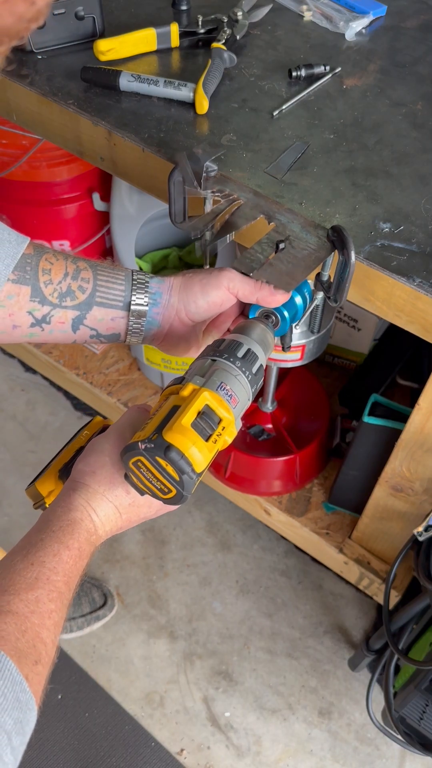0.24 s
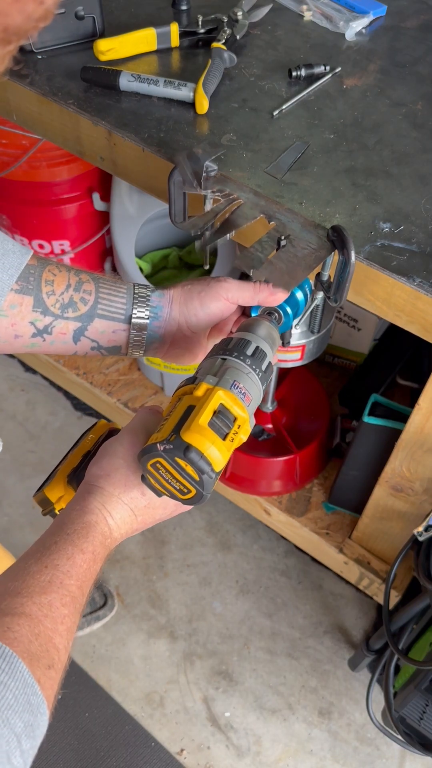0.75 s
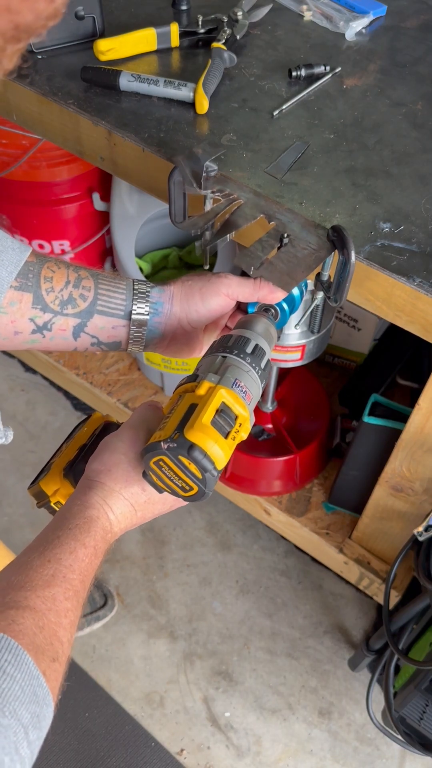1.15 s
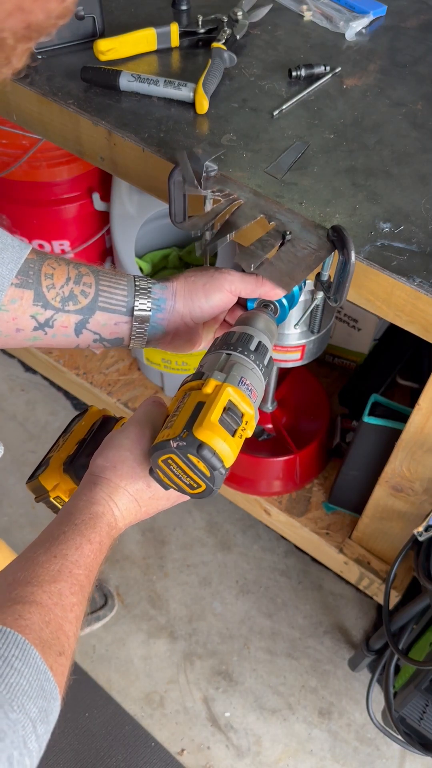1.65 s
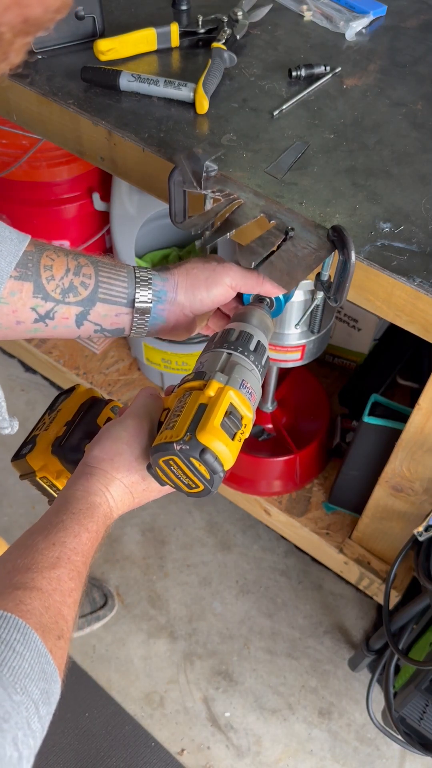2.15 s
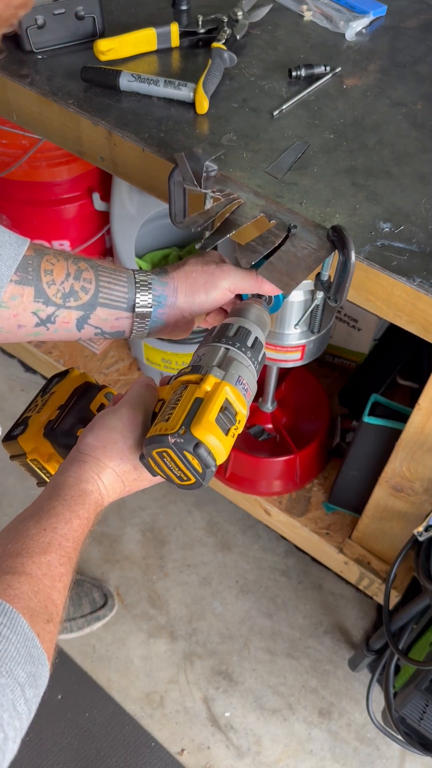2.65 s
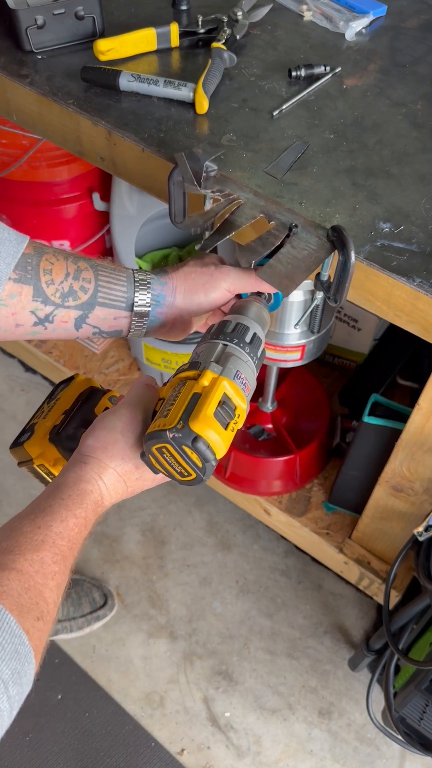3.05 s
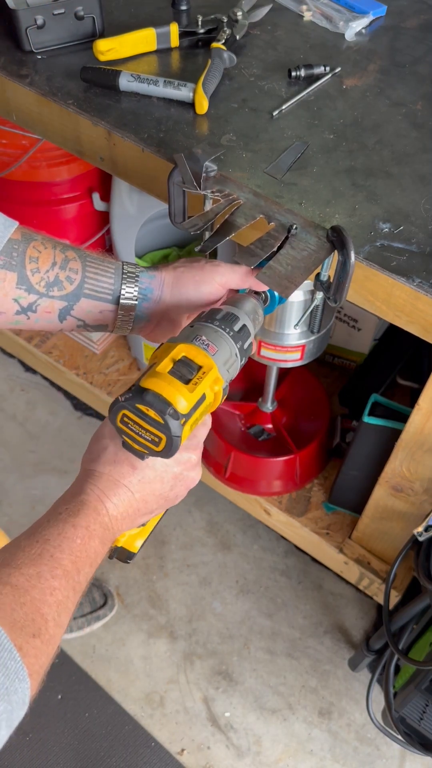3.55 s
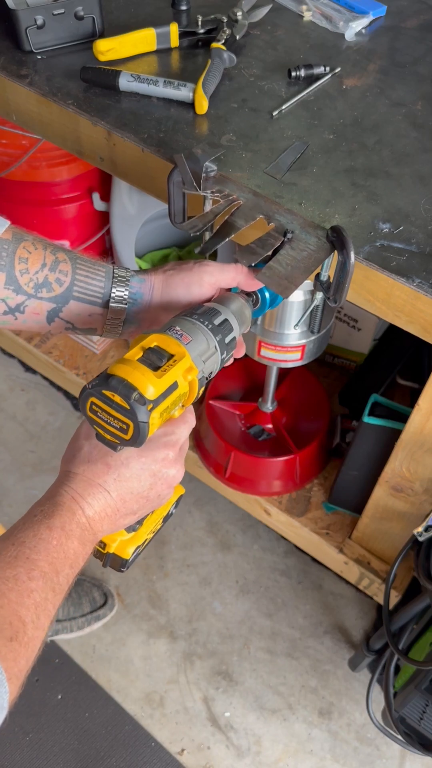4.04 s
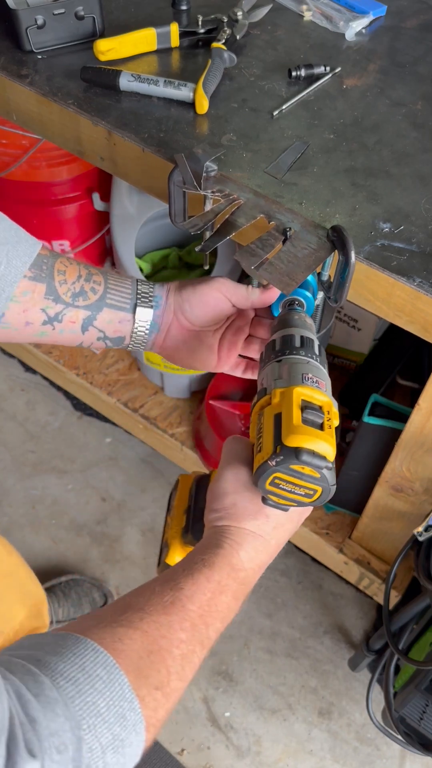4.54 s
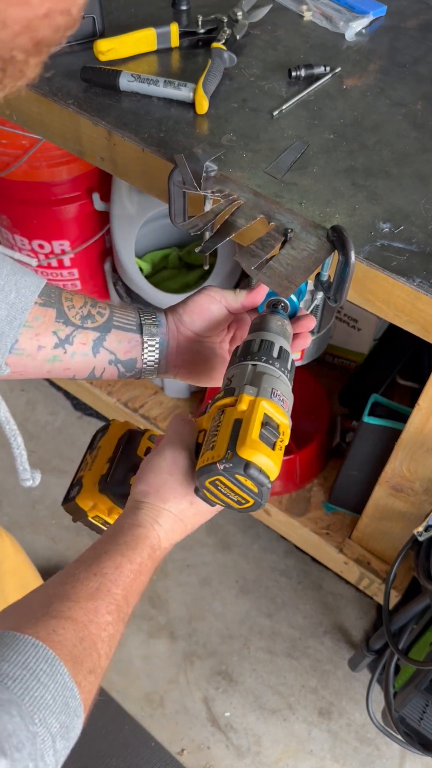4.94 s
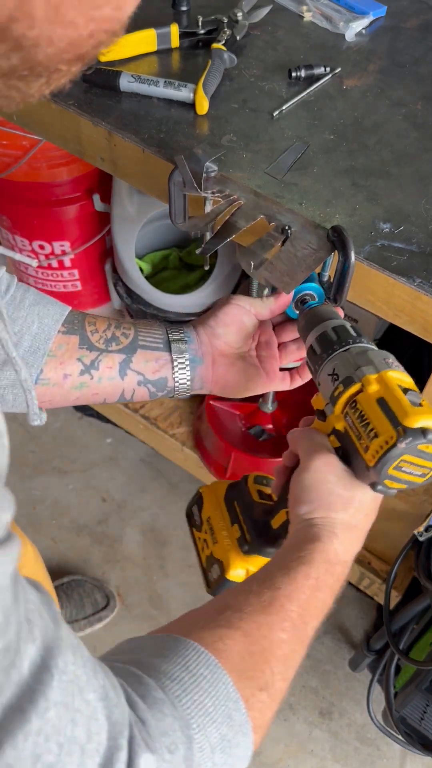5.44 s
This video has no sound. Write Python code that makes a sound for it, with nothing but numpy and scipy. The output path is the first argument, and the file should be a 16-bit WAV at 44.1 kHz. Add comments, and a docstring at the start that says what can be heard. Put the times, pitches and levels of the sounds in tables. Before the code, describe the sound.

Close up in a small garage, a cordless drill drives a nibbler through sheet steel: about twenty-two sharp snaps and clanks a second over rattling sheet and gear noise. It stops abruptly after three seconds, taps the metal, runs briefly with weaker bites and a clear whine, stops again for under a second, then restarts louder and cuts until the end. Close stereo microphone, short room tail.

```python
"""Drill-driven nibbler on sheet steel

A cordless drill drives a nibbler through a steel sheet clamped to a garage workbench, in three runs.
About 22 listed bites a second: noise bursts for chip, head and sheet, damped sines for the struck notes.
Grains of noise chatter in between; sines locked to the motor angle whine, loudest when the punch runs free.
Falling tones bump the bench, short bursts are the tool touching the sheet; a diffuse tail is the garage."""
import sys
import numpy as np
from scipy import signal
from scipy.fft import rfft, irfft, next_fast_len
from scipy.io import wavfile

SR = 44100
rng = np.random.default_rng(int(sys.argv[2]) if len(sys.argv) > 2 else 0)


def int16_out(signal):
    """Quantize to a 16-bit WAV file."""
    q = np.round(np.clip(np.atleast_2d(signal).T, -1, 1) * 32767)
    wavfile.write(sys.argv[1], SR, q.astype(np.int16))


N = 250929
TIME = np.arange(N) / SR

# Trigger held. Each row: start in seconds, stop in seconds, share of full speed,
# gear noise in dB at full speed.
DRILL_RUNS = [(-1, 3.262, 1, -35.5), (3.59, 4.285, 1.003, -35.5), (5.07, 7, 1, -29.5)]
# Resonances of the sheet under the tool. Each row: centre in Hz, width in Hz, lift in dB.
SHEET_MODES = [(381, 16, 9), (492, 36, 4.5), (552, 120, 5), (676, 45, 7), (838, 30, 4.5), (1095, 25, 4),
               (1170, 45, 0.5), (1320, 50, 4.5), (1680, 50, 3), (2265, 36, 5), (2630, 70, 4.5),
               (3236, 45, 1.5), (3886, 120, 3), (4635, 50, 3), (5720, 90, 4), (7060, 110, 6.5),
               (8250, 150, 2.5), (8900, 150, 3), (9930, 80, 2.5)]
# Spectrum of the sheet's knock. Each row: frequency in Hz, relative level in dB.
KNOCK_SPECTRUM = [(100, -28.5), (300, -19.5), (550, -7.5), (900, -2), (1250, 5), (1800, 1.5), (2500, -17.5),
                  (6000, -35.5)]
# Spectrum of the bench's thud and rumble. Each row: frequency in Hz, relative level in dB.
THUD_SPECTRUM = [(22, -34), (40, -17), (60, 4), (90, -1), (140, -5), (250, 0.5), (500, -12.5), (900, -12.5)]


def from_db(db):
    """Decibels to amplitude gain."""
    return 10 ** (np.asarray(db) / 20)


def rms_one(x):
    """Scale to unit power."""
    return x / np.sqrt(np.mean(x ** 2) + 1e-20)


def in_time(rows):
    """Each column after the time column, interpolated to every sample."""
    s, *columns = np.transpose(rows)
    return [np.interp(TIME, s, column) for column in columns]


def drift(rate_hz):
    """Slow random wander of spread 1, with rate_hz new targets a second."""
    return rms_one(np.interp(TIME * rate_hz, np.arange(4096), rng.standard_normal(4096)))


def colour(x, spectrum, modes=(), size=8192):
    """Causal filter: broad spectrum plus resonances; white noise keeps its power."""
    hz = np.maximum(np.fft.rfftfreq(size, 1 / SR), 1)
    points = np.array(spectrum)
    db = np.interp(np.log(hz), np.log(points[:, 0]), points[:, 1])
    for centre_hz, width_hz, lift_db in modes:
        db = db + lift_db / (1 + (2 * (hz - centre_hz) / width_hz) ** 2)
    cepstrum = irfft(np.log(from_db(db)))[:size // 2]
    cepstrum[1:] *= 2   # minimum phase: nothing sounds before its cause
    response = irfft(np.exp(rfft(cepstrum, size)))
    return signal.fftconvolve(x, response / np.linalg.norm(response))[:len(x)]


def grains(per_s, spread_db):
    """Random metal-to-metal contacts of uneven size; unit power."""
    hits = rng.random(N) < per_s / SR
    signs = rng.choice([-1, 1], N)
    sizes = from_db(spread_db * np.clip(rng.standard_normal(N), -2, 2))
    return rms_one(hits * signs * sizes)


def bursts(times_s, levels_db, rise_s, decay_s):
    """Envelope rising exponentially to each moment and decaying exponentially after it."""
    out = np.zeros(N)
    for s, db, rise, decay in np.broadcast(times_s, levels_db, rise_s, decay_s):
        near = slice(max(int((s - 8 * rise) * SR), 0), int((s + 8 * decay) * SR))
        t = TIME[near] - s
        out[near] += from_db(db) * np.exp(np.minimum(t / rise, -t / decay))
    return out


def ring(times_s, levels_db, hz, t60_s):
    """Two-pole resonator struck at the given moments: a damped sine."""
    clicks = np.zeros(N)
    clicks[(np.asarray(times_s) * SR).astype(int)] = from_db(levels_db)
    radius = from_db(-60 / (t60_s * SR))
    turn = 2 * np.pi * hz / SR
    feedback = [1, -2 * radius * np.cos(turn), radius * radius]
    return signal.lfilter([0, np.sin(turn)], feedback, clicks + 1e-18)


def resonance(x, hz, width_hz):
    """The part of a sound that one fixed resonance passes; gain 1 at its centre."""
    return signal.lfilter(*signal.iirpeak(hz, hz / width_hz, fs=SR), x)


def gliding(x, hz, width_hz):
    """The part a moving resonance passes: shift to 0 Hz, one-pole lowpass, shift back."""
    turn = np.exp(2j * np.pi * np.cumsum(hz) / SR)
    radius = np.exp(-np.pi * width_hz / SR)
    return 2 * (turn * signal.lfilter([1 - radius], [1, -radius], x / turn)).real


def bite_at(times_s):
    """Index of the bite in force at every sample, from 15 ms ahead of it."""
    return np.clip(np.searchsorted(times_s - .015, TIME) - 1, 0, len(times_s) - 1)


def uneven(x, times_s, spread_db=2.3):
    """Every bite excites the modes of the head with strengths of its own."""
    # Steel of the nibbler head. Each row: centre in Hz, width in Hz.
    head_modes = [(2800, 400), (3900, 450), (4450, 300), (5300, 200), (6100, 160), (7060, 130), (7500, 160),
                  (8050, 160), (8500, 160), (9400, 900)]
    which = bite_at(times_s)
    draws = np.clip(rng.standard_normal((len(times_s), len(head_modes))), -1.5, 1.5)
    gains = from_db(spread_db * draws - 1.0)
    for k, (hz, width_hz) in enumerate(head_modes):
        x = x + resonance(x * (gains[which, k] - 1), hz, width_hz)
    return x


def punch(s, snap_db, clank_db, knock_db, rattle_db, clank_hz, shear_s):
    """Punch shears, chip snaps, steel head clanks, sheet knocks and rings, bench thuds 4 ms later."""
    # Chip, head and rattle spectra. Each row: frequency in Hz, relative level in dB.
    snap_spectrum = [(200, -28), (1000, -9), (4800, -7.5), (6000, -1.5), (8300, 3.5), (10500, 1),
                     (12500, -3.5), (15500, -3.5)]
    clank_spectrum = [(300, -30), (1700, -15), (2500, -4), (3100, -0.5), (3800, 3), (4500, -1.5),
                      (5300, -13), (9000, -26)]
    rattle_spectrum = [(300, -10), (1200, -5.5), (2500, 1.5), (5000, -1.5), (8000, 3), (11000, 1),
                       (15500, -2.5)]
    # Damped notes of the sheet near the die. Each row: frequency in Hz, relative level in dB,
    # t60 in seconds.
    bite_notes = [(1010, -5, 0.018), (1290, -3, 0.026), (1750, -7, 0.018)]

    snap = bursts(s, snap_db + 1.3, rise_s=shear_s / 3, decay_s=shear_s)
    snap = snap * grains(per_s=40000, spread_db=1.0)
    clank = bursts(s, clank_db - 2.4, rise_s=.0004 + shear_s / 3, decay_s=.001 + shear_s)
    clank = clank * grains(per_s=40000, spread_db=1.0)
    pitched = gliding(clank, clank_hz[bite_at(s)], width_hz=260)
    clank = colour(clank, clank_spectrum) + from_db(7.0) * pitched
    rattle = bursts(s, rattle_db - 1.4, rise_s=.0026, decay_s=.009)
    rattle = rattle * grains(per_s=9000, spread_db=3.5)
    head = uneven(colour(snap, snap_spectrum) + clank + colour(rattle, rattle_spectrum, SHEET_MODES), s)

    knock_s = s - .0005
    knock = bursts(knock_s, knock_db + .3, rise_s=.002, decay_s=.0045)
    knock = knock * grains(per_s=15000, spread_db=1.0)
    notes = np.zeros(N)
    for k, (hz, db, t60_s) in enumerate(bite_notes):
        strike_db = knock_db + db + .8 + rng.normal(0, 2.5, len(s))
        notes += (-1) ** k * ring(knock_s, strike_db, hz, t60_s)
    thud = bursts(s + .004, knock_db - 11.5, rise_s=.0009, decay_s=.0053)
    thud = thud * grains(per_s=6000, spread_db=1.0)
    return head + notes + colour(knock, KNOCK_SPECTRUM, SHEET_MODES) + colour(thud, THUD_SPECTRUM)


def chatter(bite_s, speed, return_s=.021, scrape_db=-4.5, clatter_db=-.9, drone_db=-.8,
            speed_power=5.0, rough_db=1.5, uneven_db=2.3):
    """Sheet chatters in the die, most as the punch scrapes back up; fades as the motor slows."""
    # Chatter as the tool is fed. Each row: time in seconds, bright clatter in dB, sheet drone in dB,
    # both at full speed before roughness and trim.
    feed = [(0, -27, -31.5), (.25, -27.5, -33.5), (.31, -32.5, -41), (.45, -35, -47), (.49, -29, -35),
            (1.1, -26.3, -34), (1.85, -26.3, -33.5), (2.2, -25.5, -39), (2.98, -25.5, -41),
            (3.2, -36.5, -46), (3.69, -40, -52), (3.73, -23.5, -34), (3.9, -30.5, -47), (4.14, -32, -51),
            (4.22, -27, -40), (5.15, -30, -38), (5.19, -22.5, -34.5), (5.35, -23.5, -37),
            (5.43, -22.8, -29), (5.69, -24.5, -35)]
    # Each row: frequency in Hz, relative level in dB.
    clatter_spectrum = [(200, -35.5), (700, -9), (1200, -3), (2000, 1.3), (3500, -2.5), (5500, -0.5),
                        (7000, -0.5), (8700, 5.5), (10500, 1), (12500, -3), (15500, 1.5)]
    drone_spectrum = [(40, -22), (120, -13), (280, -9), (480, -4.5), (750, -2), (1100, 0.5), (2000, -14),
                      (6000, -29)]

    bright, low = from_db(in_time(feed)) * speed ** speed_power * from_db(rough_db * drift(rate_hz=260))
    late, hard = rng.standard_normal((len(bite_s), 2)).T
    scrape_s = bite_s + return_s + .003 * late
    hard_db = scrape_db + uneven_db * np.clip(hard, -1.5, 1.5)
    scrape = 1 + bursts(scrape_s, hard_db, rise_s=.007, decay_s=.006)
    clatter = bright * scrape * grains(per_s=7000, spread_db=2.6)
    clatter = uneven(colour(clatter, clatter_spectrum, SHEET_MODES), bite_s, spread_db=3.5)
    drone = colour(low * grains(per_s=2500, spread_db=2.5), drone_spectrum, SHEET_MODES)
    return from_db(clatter_db) * clatter + from_db(drone_db) * drone


def swelling_bands(x, fade_s=.06):
    """Bands of tool and cutting noise swell and fade: sheet tones, low rumble, motor hum; some slide."""
    # Each row: start in seconds, end in seconds, start in Hz, end in Hz, width in Hz, lift in dB.
    lifted_bands = [(-.1, 0.24, 2240, 2240, 170, 5), (-.1, .3, 705, 705, 45, 6),
                    (0.48, 0.82, 715, 730, 40, 12), (-.1, .9, 2700, 2600, 350, 3.5),
                    (.9, 1.45, 2640, 2640, 200, 3.5), (.9, 1.15, 700, 675, 40, 5),
                    (1.05, 1.42, 560, 530, 40, 6), (1.48, 2.02, 540, 480, 35, 7),
                    (1.2, 1.55, 1100, 1085, 40, 5), (1.5, 2.45, 835, 815, 30, 6),
                    (2.1, 3.17, 950, 920, 130, 4.5), (2.72, 3.14, 1120, 1020, 30, 9),
                    (2.5, 3.15, 2310, 2310, 222, 3), (2, 3.1, 3800, 3700, 600, 1),
                    (3.68, 3.93, 700, 680, 35, 8), (4.13, 4.33, 700, 680, 40, 10),
                    (5.1, 5.28, 4300, 4150, 250, 5), (5.28, 5.53, 4150, 4150, 800, 3),
                    (5.15, 5.75, 215, 215, 70, 7), (.79, 1.0, 2980, 2980, 130, 6),
                    (2.15, 2.42, 10150, 9750, 200, 8), (2.83, 3.03, 7060, 7060, 50, 10),
                    (3.02, 3.12, 2970, 2970, 100, 4), (2.95, 3.25, 400, 380, 120, 6),
                    (2.98, 3.24, 160, 160, 70, 8), (3.62, 3.76, 4200, 4200, 400, 5),
                    (3.7, 3.86, 925, 925, 50, 7), (3.9, 4.14, 670, 670, 35, 6),
                    (3.7, 3.85, 5880, 5880, 90, 7), (5.36, 5.62, 7600, 7450, 250, 4)]
    out = x.copy()
    for start_s, end_s, from_hz, to_hz, width_hz, lift_db in lifted_bands:
        span = (TIME > start_s) & (TIME < end_s)
        t = TIME[span]
        swell = np.clip(np.minimum(t - start_s, end_s - t) / fade_s, 0, 1)
        passed = gliding(x[span], np.interp(t, [start_s, end_s], [from_hz, to_hz]), width_hz)
        out[span] += (from_db(lift_db) - 1) * swell * passed
    return out


def motor_speed(spin_up_s=.035, creep_s=.092, brake_s=.027, creep_share=.58):
    """Share of full speed: motor leaps at each trigger pull, creeps up the rest, is braked to a halt."""
    speed = 0
    for start_s, stop_s, top, _ in DRILL_RUNS:
        since = np.maximum(TIME - start_s, 0)
        left = np.maximum(stop_s - TIME, 0)
        leap = 1 - np.exp(-since / spin_up_s)
        creep = 1 - creep_share * np.exp(-since / creep_s)
        brake = 1 - np.exp(-left / brake_s)
        speed = speed + top * leap * creep * brake
    return speed


def whine(angle, mesh_order=4, flutter_db=1.6):
    """Motor note and gear meshing: sines at multiples of the motor angle, levels fluttering."""
    # Each row: time in seconds, then level in dB at full speed before flutter of the motor note,
    # the gear mesh, its overtone and the shrill lines.
    whine_levels = [(0, -49, -38, -41, -50), (.2, -48, -39, -42, -50), (.3, -50, -38.5, -38, -47),
                    (.42, -51, -38, -38, -47), (.52, -49, -38, -42, -50), (.9, -50, -38.5, -43, -50),
                    (1.7, -54, -39.5, -46, -52), (2.1, -54, -43, -48, -52), (3.1, -53, -43, -48, -52),
                    (3.18, -56, -52, -57, -57), (3.72, -52, -40, -47, -52), (3.87, -46, -34, -38.5, -42),
                    (3.98, -47, -34.5, -35.5, -36), (4.04, -49, -37, -46, -37), (4.1, -49, -30.5, -39, -38),
                    (4.145, -51, -31.5, -43, -42), (4.175, -55, -43, -50, -50), (5.2, -52, -38, -50, -52),
                    (5.27, -43, -32.5, -46, -50), (5.32, -39, -36, -48, -50), (5.45, -41, -39, -48, -50),
                    (5.69, -48, -42, -48, -50)]
    # Level of each shrill line in dB relative to the shrill column.
    shrill_offsets_db = [-8, -5, 0]
    shrill_orders = [18, 20, 23]   # multiples of the motor speed

    motor_db, mesh_db, overtone_db, shrill_db = in_time(whine_levels)
    lines = [(1, motor_db), (mesh_order, mesh_db), (2 * mesh_order, overtone_db)]
    lines += [(order, shrill_db + db) for order, db in zip(shrill_orders, shrill_offsets_db)]
    return sum(from_db(db + flutter_db * drift(rate_hz=70)) * np.sin(order * angle) for order, db in lines)


def drill(bite_s, speed, full_turns_per_s=386, gear_ratio=17.28, shakes_per_stroke=4, wobble=.0022,
          tooth_depth=.25, jolt_db=2.5, rumble_db=-5.0, gear_power=3.5):
    """Gears tick and whine with motor speed; the crank shakes the bench low, hardest after a bite."""
    # Bench shake. Each row: time in seconds, level in dB before speed, jolt and wander.
    shake_levels = [(0, -43), (.25, -44), (.45, -68), (.55, -46.5), (.95, -40), (1.3, -59.5), (2.8, -68),
                    (3.05, -43.5), (3.22, -64), (3.76, -46), (3.88, -73), (5.1, -70), (5.2, -48),
                    (5.45, -50)]
    # Each row: frequency in Hz, relative level in dB.
    gear_spectrum = [(100, -15.5), (250, -5), (380, -4.5), (550, -5), (680, 2.5), (950, -2), (1300, 0),
                     (2000, -2), (5500, -2), (7600, 3), (10000, -3.5), (15500, -7.5)]

    starts_s, _, _, gear_db = np.transpose(DRILL_RUNS)
    run = np.searchsorted(starts_s, TIME) - 1
    turns_per_s = full_turns_per_s * speed * (1 + wobble * drift(rate_hz=70))
    angle = 2 * np.pi * np.cumsum(turns_per_s) / SR
    drive = speed ** gear_power
    tick = 1 + tooth_depth * np.cos(angle)   # once per motor turn
    teeth = drive * from_db(gear_db[run]) * grains(per_s=12000, spread_db=5.0) * tick
    jolt = .4 + bursts(bite_s + .0092, jolt_db, rise_s=.0034, decay_s=.016)
    shake = drive * jolt * from_db(in_time(shake_levels)[0] + 2.0 * drift(rate_hz=36))
    hum = shake * np.sin(angle * shakes_per_stroke / gear_ratio)
    rumble = from_db(rumble_db) * colour(shake * rng.standard_normal(N), THUD_SPECTRUM)
    return drive * whine(angle) + colour(teeth, gear_spectrum) + hum + rumble


def slow_starts(delay_s=.018, length_s=.15, fade_s=.02, buzz_db=-33.5):
    """With the trigger half pulled the slack gears buzz in their housing, briefly after each start."""
    # Each row: frequency in Hz, relative level in dB.
    buzz_spectrum = [(200, -16), (750, -3), (1020, 5), (1300, 0.5), (3500, 1.5), (4250, 8), (5000, -2),
                     (7700, 2.5), (15000, -14.5)]
    knots_s = [0, fade_s, length_s - fade_s, length_s]
    level = sum(np.interp(TIME - start_s - delay_s, knots_s, [0, .55, 1.2, 0]) for start_s, *_ in DRILL_RUNS)
    return colour(from_db(buzz_db) * level * grains(per_s=6000, spread_db=4.0), buzz_spectrum)


def bumps(top_hz=560, end_hz=45, glide_s=.0036, swell_s=.0075, bluntness=1.4, sway_hz=54):
    """Bending waves arrive highs first, so bumps fall in pitch; the heavy bench top sways at a low note."""
    # Sheet flexes and bumps on the bench. Each row: time in seconds, peak level in dB.
    bump_times = [(.742, -27), (.877, -33.5), (.966, -23.5), (1.460, -22.5), (2.938, -31)]
    # Bench top sways. Each row: time in seconds, peak level in dB, decay in seconds.
    bench_sways = [(1.01, -35.5, .16), (1.55, -35, .03), (2.965, -41, .04)]
    out = np.zeros(N)
    for s, db in bump_times:
        t = np.clip(TIME - s, 0, 1)
        cycles = end_hz * t + (top_hz - end_hz) * glide_s * (1 - np.exp(-t / glide_s))
        # peaks at 1 after swell_s
        swell = np.sqrt(t / swell_s) * np.exp((1 - (t / swell_s) ** bluntness) / (2 * bluntness))
        out += from_db(db) * swell * np.sin(2 * np.pi * cycles)
    s, db, decay_s = np.transpose(bench_sways)
    return out + bursts(s, db, rise_s=.015, decay_s=decay_s) * np.sin(2 * np.pi * sway_hz * TIME)


def touches():
    """The nibbler head taps and scuffs the sheet, which rings on."""
    # Each row: time in seconds, scuff in dB, knock in dB, decay in seconds, sheet ring in dB.
    contacts = [(3.548, -55, -68, 0.00295, -94), (3.592, -46, -57, 0.0093, -77),
                (3.607, -46, -54, .01, -78), (3.6188, -21, -33, 0.0015, -68), (4.441, -54, -70, 0.026, -82),
                (4.478, -52, -53, 0.035, -78), (4.973, -50, -56, 0.019, -52), (5.08, -55, -46, .002, -79),
                (5.096, -42, -45, 0.009, -76), (5.111, -47, -40, 0.0038, -72)]
    # Free ring of the sheet. Each row: frequency in Hz, relative level in dB, t60 in seconds.
    free_ring = [(681, -4, .1), (1085, 0, 0.42), (1875, -7, .3), (5184, -29, .2), (7009, -15, .12)]
    # Each row: frequency in Hz, relative level in dB.
    scuff_spectrum = [(300, -10), (1200, -5), (2500, 1.5), (4800, 0), (6100, 4.5), (7200, -1), (8400, 1),
                      (11000, -4), (15500, -8)]
    s, scuff_db, knock_db, decay_s, ring_db = np.transpose(contacts)
    scuff = bursts(s, scuff_db, rise_s=.001, decay_s=decay_s) * grains(per_s=14000, spread_db=7.0)
    knock = bursts(s, knock_db, rise_s=.001, decay_s=decay_s) * grains(per_s=6200, spread_db=15.0)
    rings = sum(ring(s, ring_db + db, hz, t60_s) for hz, db, t60_s in free_ring)
    scuff = colour(scuff, scuff_spectrum, SHEET_MODES)
    return scuff + colour(knock, KNOCK_SPECTRUM, SHEET_MODES) + rings


def ping():
    """The steel punch rings short and bright as the crank takes up its slack."""
    # Each row: time in seconds, level in dB, frequency in Hz, t60 in seconds.
    punch_ring = [(3.6185, -22, 8620, .02)]
    return sum(ring([s], [db], hz, t60_s) for s, db, hz, t60_s in punch_ring)


def squeak():
    """The dry punch squeaks once in its guide: a brief rising sine under a half-sine envelope."""
    # One row: start in seconds, end in seconds, start in Hz, end in Hz, peak level in dB.
    guide_squeak = (5.188, 5.212, 4000, 4550, -30)
    start_s, end_s, from_hz, to_hz, db = guide_squeak
    along = np.clip((TIME - start_s) / (end_s - start_s), 0, 1)
    cycles = np.cumsum(from_hz + (to_hz - from_hz) * along) / SR
    return from_db(db) * np.sin(np.pi * along) * np.sin(2 * np.pi * cycles)


def at_ports(x):
    """Sound reaches the two microphone ports out of step in the treble."""
    # Phase by which the left port leads. Each row: frequency in Hz, lead in radians.
    port_phase = [(0, 0), (4000, .1), (4650, .6), (5000, 1.8), (5400, 0), (6300, .1), (7200, .6),
                  (10700, 2.3), (12500, 3.1), (15500, 4.2)]
    size = next_fast_len(N + SR // 10)
    lead = np.interp(np.fft.rfftfreq(size, 1 / SR), *np.transpose(port_phase))
    halves = np.array([[.5], [-.5]])
    return irfft(rfft(x, size) * np.exp(1j * lead * halves), size)[:, :N]


def garage(x, first_echo_s=.004, t60_s=.41):
    """Convolution with a short diffuse noise tail, alike at both ports in the bass."""
    # Tail common to both ports, and its side part. Each row: frequency in Hz, relative level in dB.
    room_spectrum = [(60, 4.5), (300, 2.5), (1500, 4), (5000, 7.5), (9000, -2.5), (15000, -10.5)]
    side_spectrum = [(60, -9), (250, -8), (550, 4.5), (1500, -0.5), (3000, 0.5), (15000, 5.5)]
    t = TIME[:SR]
    tail = from_db(-60 * t / t60_s) * (t > first_echo_s)
    mid = colour(tail * rng.standard_normal(SR), room_spectrum)
    side = colour(colour(tail * rng.standard_normal(SR), room_spectrum), side_spectrum)
    responses = (mid + side, mid - side)
    return np.array([signal.fftconvolve(x, h / np.linalg.norm(h))[:N] for h in responses])


def still_air(level_db=-63.5):
    """Steady background noise, mostly shared by the two ports."""
    # Each row: frequency in Hz, relative level in dB.
    air_spectrum = [(25, -14), (45, -6), (80, 0.5), (130, -1.5), (200, -3.5), (300, -6), (400, -6.5),
                    (750, -13.3), (1500, -21.5), (3500, -27.5), (9000, -35.5), (15000, -46.5)]
    shared, left, right = (colour(rng.standard_normal(N), air_spectrum) for _ in range(3))
    return from_db(level_db) * (shared + .2 * np.array([left, right]))


def scene(scatter_db=-10.0, garage_db=-12.3):
    """Tool and sheet close by, the garage and its still air around them."""
    # Each row: time in seconds; chip snap, head clank, sheet knock and rattle in dB before trim;
    # clank pitch in Hz; shearing time in seconds.
    bites = [(0.0256, -17.2, -21.4, -24.1, -14.8, 2300.0, 0.0033),
             (0.0702, -16.4, -19.8, -24.5, -15.0, 2720.0, 0.0033),
             (0.115, -20.7, -21.3, -22.5, -13.2, 2300.0, 0.0033),
             (0.1596, -22.0, -21.8, -26.7, -17.0, 2480.0, 0.0033),
             (0.2036, -11.3, -17.1, -29.6, -18.4, 3130.0, 0.0005),
             (0.2498, -28.6, -35.2, -33.8, -25.7, 2300.0, 0.0033),
             (0.4749, -26.4, -29.3, -30.6, -19.3, 2590.0, 0.0033),
             (0.5162, -17.1, -23.1, -29.9, -16.6, 2300.0, 0.0033),
             (0.562, -19.9, -20.8, -21.0, -15.4, 2940.0, 0.0033),
             (0.607, -16.7, -22.2, -28.0, -16.7, 3770.0, 0.0033),
             (0.652, -10.9, -17.1, -32.0, -23.4, 2620.0, 0.0013),
             (0.696, -17.2, -20.7, -25.5, -15.7, 2560.0, 0.0033),
             (0.74, -14.3, -14.7, -26.1, -19.3, 2610.0, 0.0011),
             (0.785, -17.8, -18.0, -25.7, -17.4, 2860.0, 0.0033),
             (0.8294, -8.6, -14.4, -30.3, -24.0, 2900.0, 0.0005),
             (0.8738, -14.3, -15.9, -34.9, -24.5, 3600.0, 0.0013),
             (0.919, -11.2, -12.7, -26.8, -16.7, 3030.0, 0.0011),
             (0.9656, -11.5, -16.7, -28.9, -24.2, 4190.0, 0.0013),
             (1.01, -19.5, -22.0, -24.7, -16.8, 2670.0, 0.0033),
             (1.0547, -7.6, -15.6, -24.8, -21.9, 2850.0, 0.0005),
             (1.0992, -16.9, -22.2, -26.5, -17.6, 2620.0, 0.0033),
             (1.1447, -8.4, -13.9, -33.4, -22.8, 2700.0, 0.0009),
             (1.189, -18.5, -21.5, -23.3, -19.7, 3610.0, 0.0033),
             (1.2336, -5.3, -13.6, -26.9, -25.7, 3280.0, 0.0005),
             (1.2785, -10.7, -16.1, -29.1, -23.0, 2680.0, 0.0017),
             (1.3246, -15.2, -23.9, -23.0, -15.7, 2670.0, 0.0033),
             (1.3684, -15.9, -23.0, -22.1, -16.0, 2620.0, 0.0033),
             (1.4131, -14.7, -19.7, -23.9, -14.1, 3510.0, 0.0033),
             (1.4583, -6.8, -16.1, -31.7, -23.9, 2860.0, 0.0007),
             (1.5038, -13.8, -22.7, -20.8, -16.1, 3890.0, 0.0026),
             (1.5482, -21.2, -26.2, -22.3, -16.7, 2640.0, 0.0033),
             (1.5929, -17.2, -25.9, -25.9, -19.1, 2710.0, 0.0033),
             (1.6378, -14.7, -18.3, -22.5, -20.5, 3660.0, 0.0011),
             (1.6822, -17.3, -19.9, -23.5, -17.9, 3360.0, 0.0026),
             (1.7266, -19.9, -23.0, -23.5, -14.9, 3700.0, 0.0033),
             (1.7718, -17.3, -18.8, -22.2, -18.5, 2720.0, 0.0026),
             (1.8162, -10.3, -15.4, -31.6, -21.8, 4570.0, 0.0005),
             (1.862, -17.2, -23.7, -25.6, -17.3, 2950.0, 0.0033),
             (1.9078, -12.3, -17.7, -25.8, -26.2, 3910.0, 0.0021),
             (1.9516, -25.7, -23.7, -20.6, -18.1, 3170.0, 0.0033),
             (1.9952, -22.9, -22.8, -26.1, -15.4, 3900.0, 0.0033),
             (2.04, -5.9, -13.8, -23.5, -20.5, 4120.0, 0.0005),
             (2.0854, -14.3, -17.8, -29.8, -25.0, 4020.0, 0.0013),
             (2.1302, -22.6, -24.2, -24.4, -20.7, 3780.0, 0.0017),
             (2.1754, -22.3, -24.0, -22.0, -18.8, 3140.0, 0.0033),
             (2.2207, -23.3, -26.7, -25.3, -15.6, 3840.0, 0.0033),
             (2.2632, -13.1, -19.4, -24.5, -18.5, 3110.0, 0.0005),
             (2.3082, -6.9, -16.4, -26.3, -21.5, 2490.0, 0.0007),
             (2.355, -8.3, -14.8, -27.2, -23.4, 3680.0, 0.0005),
             (2.3976, -15.2, -19.3, -23.4, -20.5, 3190.0, 0.0011),
             (2.4432, -10.5, -19.0, -28.8, -22.9, 3880.0, 0.0007),
             (2.4885, -25.8, -25.2, -22.2, -21.7, 3870.0, 0.0033),
             (2.5331, -14.2, -16.5, -23.2, -26.0, 3670.0, 0.0011),
             (2.5777, -21.2, -24.3, -23.7, -23.0, 3670.0, 0.0021),
             (2.6223, -17.2, -13.9, -24.3, -20.0, 3240.0, 0.0021),
             (2.6677, -9.2, -18.8, -31.2, -27.8, 3830.0, 0.0005),
             (2.7118, -12.6, -18.4, -26.7, -18.7, 3840.0, 0.0005),
             (2.7565, -8.8, -18.6, -30.9, -27.8, 3750.0, 0.0005),
             (2.8006, -15.6, -15.5, -25.5, -17.8, 3710.0, 0.0026),
             (2.8481, -15.0, -21.6, -25.2, -19.7, 2300.0, 0.0026),
             (2.8912, -21.7, -21.5, -22.6, -19.9, 3780.0, 0.0033),
             (2.9364, -10.1, -16.9, -28.8, -24.8, 3750.0, 0.0011),
             (2.9809, -23.5, -22.9, -23.6, -18.2, 3590.0, 0.0033),
             (3.0264, -9.6, -18.0, -28.9, -24.6, 2310.0, 0.0005),
             (3.0696, -16.3, -16.8, -25.8, -18.2, 2920.0, 0.0017),
             (3.1149, -13.8, -18.1, -30.0, -19.6, 3940.0, 0.0007),
             (3.1846, -17.2, -21.0, -41.1, -29.2, 2960.0, 0.0009),
             (3.7252, -20.2, -27.9, -28.9, -16.5, 4170.0, 0.0033),
             (3.7756, -18.3, -28.2, -29.8, -14.1, 3030.0, 0.0033),
             (3.8216, -23.8, -28.1, -33.9, -16.3, 4010.0, 0.0033),
             (3.8749, -23.4, -32.0, -32.8, -21.9, 3040.0, 0.0033),
             (4.0474, -23.3, -35.5, -35.6, -21.1, 3090.0, 0.0033),
             (4.0926, -28.8, -32.9, -31.7, -21.3, 3090.0, 0.0033),
             (4.1426, -30.6, -29.5, -32.2, -25.8, 2650.0, 0.0033),
             (4.1884, -19.6, -34.9, -31.2, -18.1, 2300.0, 0.0033),
             (5.1748, -21.9, -27.5, -26.1, -15.8, 4160.0, 0.0033),
             (5.2357, -21.3, -23.6, -25.9, -14.8, 3970.0, 0.0033),
             (5.2583, -16.2, -19.1, -34.0, -21.6, 3550.0, 0.0005),
             (5.2845, -19.0, -19.8, -20.3, -13.0, 3810.0, 0.0033),
             (5.3311, -12.4, -10.3, -26.6, -21.8, 3790.0, 0.0005),
             (5.3776, -8.7, -16.3, -24.9, -20.6, 4390.0, 0.0005),
             (5.4238, -13.8, -14.9, -20.5, -10.4, 3830.0, 0.0033),
             (5.4689, -11.1, -11.2, -20.9, -15.8, 3690.0, 0.0013),
             (5.5143, -5.5, -18.4, -19.1, -14.3, 4270.0, 0.0005),
             (5.5592, -15.2, -18.0, -23.0, -15.3, 3830.0, 0.0033),
             (5.6044, -10.4, -11.7, -24.4, -16.5, 4010.0, 0.0005),
             (5.65, -5.5, -13.4, -29.0, -20.9, 3710.0, 0.0005)]
    # Cutting noise from across the sheet. Each row: frequency in Hz, relative level in dB.
    scatter_spectrum = [(30, -9.5), (120, -9), (300, -5.5), (600, -2.5), (1400, -5), (2500, -7.5),
                        (3300, 3), (5000, 7), (6100, -1), (8000, 4.5), (11000, 2), (12800, -3),
                        (15000, 5.5)]

    speed = motor_speed()
    bite_s, *strengths = np.transpose(bites)
    work = swelling_bands(punch(bite_s, *strengths) + chatter(bite_s, speed) + drill(bite_s, speed))
    work = work + slow_starts() + bumps() + touches() + ping() + squeak()
    # far parts of the sheet rattle on their own: fresh draws, opposite sign at the ports
    far = swelling_bands(punch(bite_s, *strengths) + chatter(bite_s, speed))
    wide = at_ports(colour(far, scatter_spectrum)) * np.array([[1], [-1]])
    return at_ports(work) + from_db(scatter_db) * wide + from_db(garage_db) * garage(work) + still_air()


def record(dry, low_cut_hz=25, cutoff_hz=16000, ceiling=.85):
    """The microphone sheds the deepest bass, the highest peaks are rounded, the top is cut."""
    low_cut = signal.butter(2, low_cut_hz, "high", fs=SR, output="sos")
    heard = signal.sosfilt(low_cut, dry)
    steep = signal.firwin(301, cutoff_hz, fs=SR)
    return signal.fftconvolve(ceiling * np.tanh(heard / ceiling), steep[None], mode="same")


dry = scene()
out = record(dry)
int16_out(out)
```